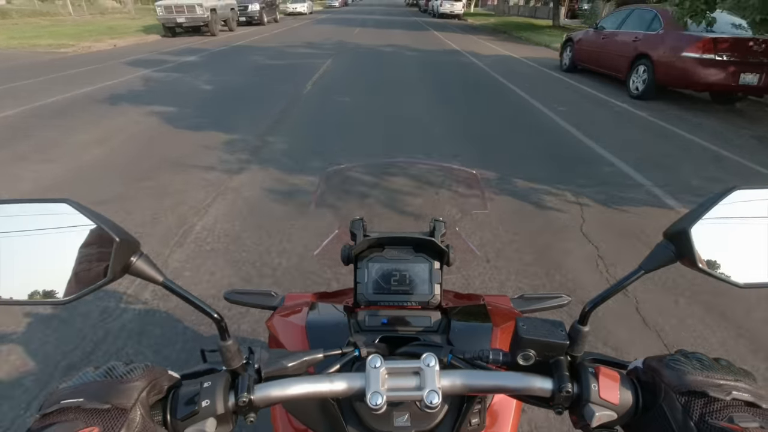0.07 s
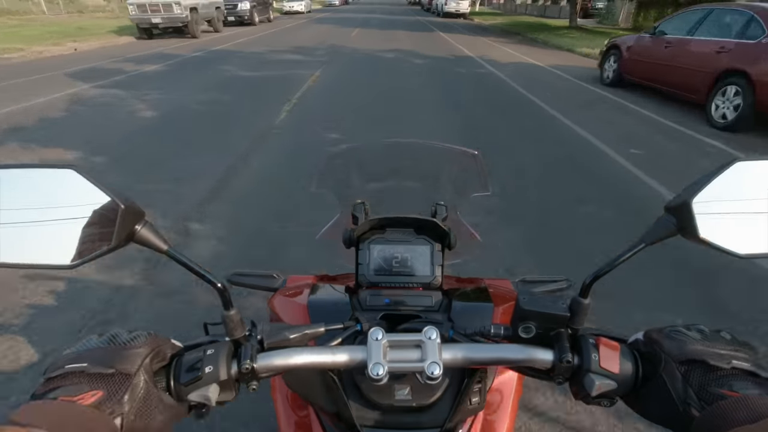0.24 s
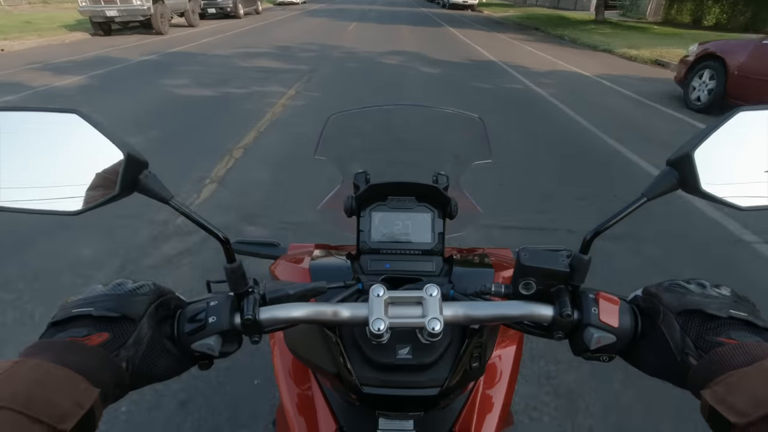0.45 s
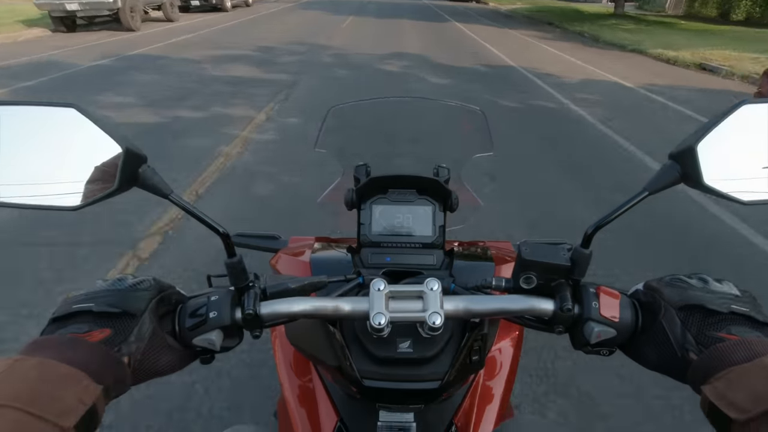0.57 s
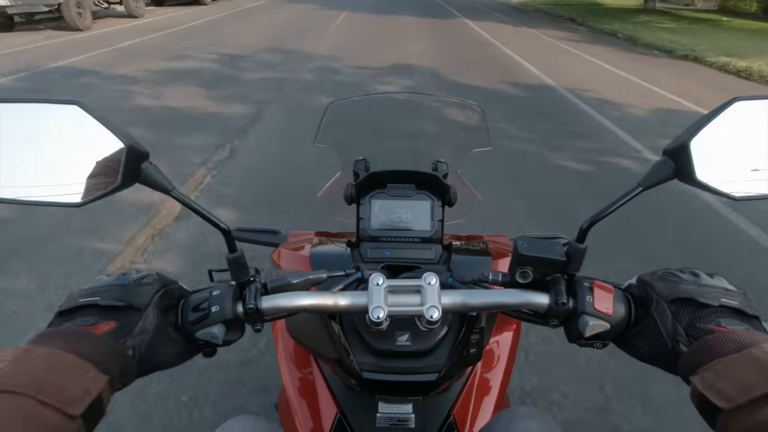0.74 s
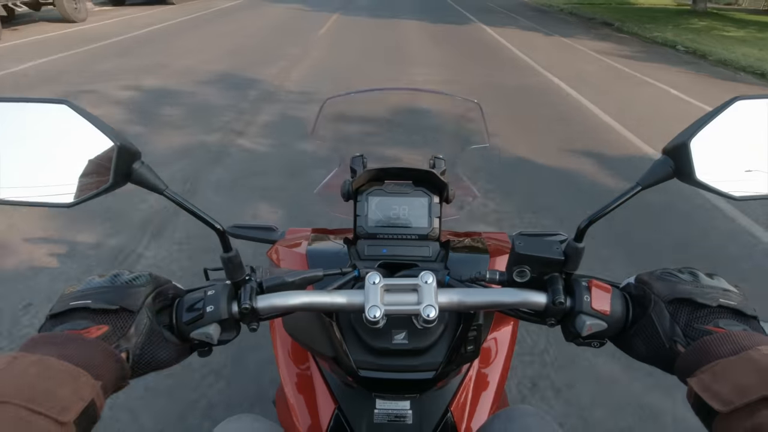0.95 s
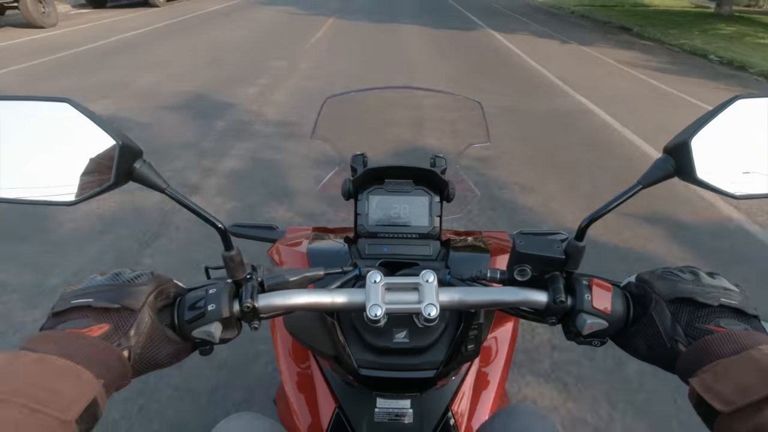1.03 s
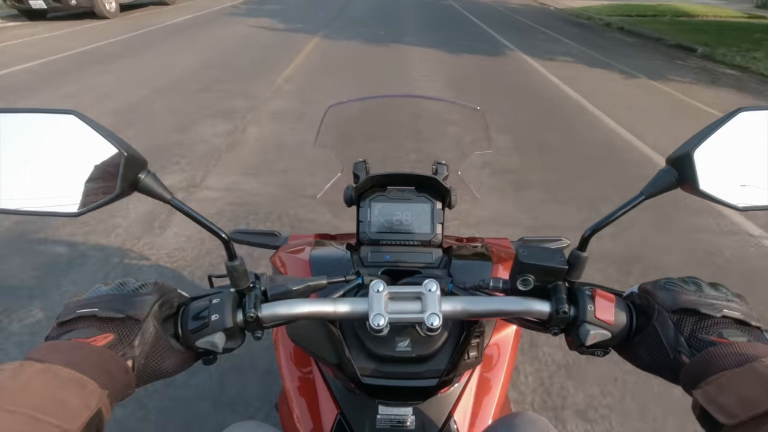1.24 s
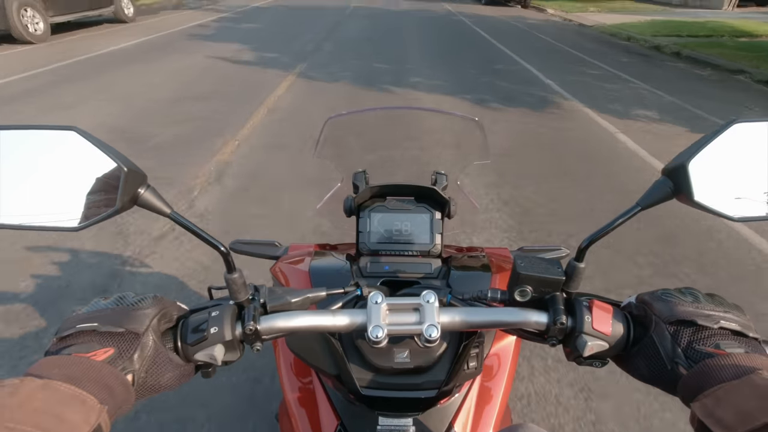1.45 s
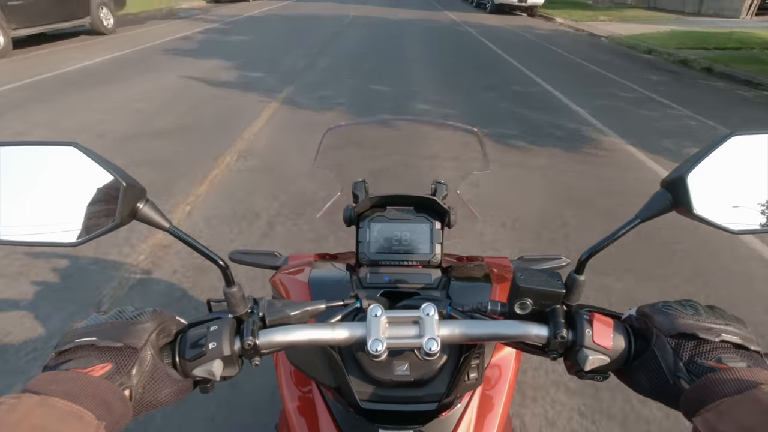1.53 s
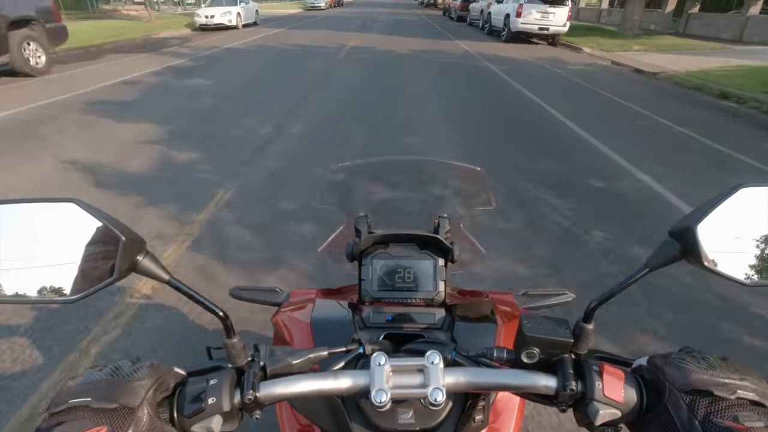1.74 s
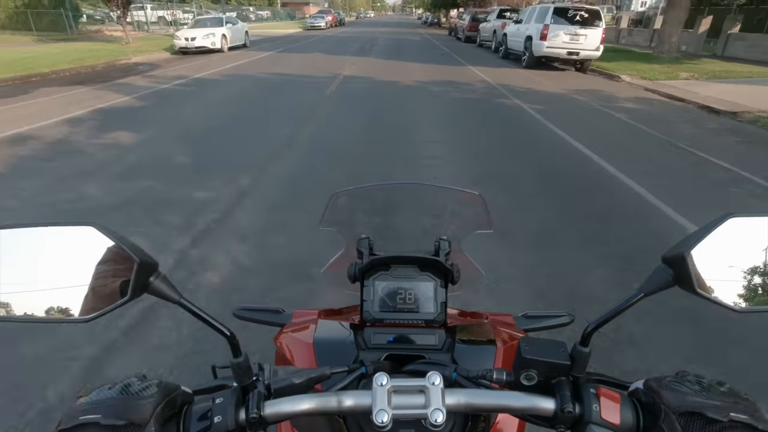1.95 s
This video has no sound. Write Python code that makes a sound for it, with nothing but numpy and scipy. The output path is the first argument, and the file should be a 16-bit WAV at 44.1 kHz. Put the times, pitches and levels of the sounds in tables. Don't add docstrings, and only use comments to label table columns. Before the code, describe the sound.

Wind buffeting on a rider's chest microphone fills all two seconds: deep, uneven rumble with soft thumps, strong at the start, around 0.77 and 1.13, and densest from 1.5 to the end. Far quieter, a small single-cylinder engine drones steadily under slightly rising load, with throbbing air and tyre hiss. The hiss briefly lifts near 0.74 passing parked cars; tiny grit ticks are nearly buried.

```python
import sys
import numpy as np
from scipy import signal
from scipy.io import wavfile
from scipy.ndimage import uniform_filter1d

SR = 44100
rng = np.random.default_rng(int(sys.argv[2]) if len(sys.argv) > 2 else 0)


def int16_out(signal):
    q = np.round(np.clip(np.atleast_2d(signal).T, -1, 1) * 32767)
    wavfile.write(sys.argv[1], SR, q.astype(np.int16))


def rack_gain(trim_db):
    fader = np.asarray(trim_db, float)
    return 10 ** (fader / 20)


N = 88200

# (time [s], gust level [dB], airstream level [dB], upward spread of buffet [dB])
AIRFLOW = [(0.03, -38.5, -55.5, -4), (0.072, -37.5, -59, -3), (0.1, -38.5, -57, 0),
           (0.37, -34.5, -58, -2.5), (0.408, -32.5, -57, 1.5), (0.574, -35.5, -57, -1.5),
           (0.77, -31, -56.5, 2.5), (0.812, -32, -55.5, 1.5), (1.082, -37, -55, 3), (1.12, -28, -57.5, 0.5),
           (1.186, -36, -56, 2), (1.59, -33.5, -52, 4.5), (1.624, -34, -52, 1.5), (1.672, -31.5, -57, 1),
           (1.698, -35.5, -50.5, 4.5), (1.742, -32, -54, 3), (1.774, -29.5, -52.5, 3),
           (1.97, -31.5, -53.5, 4.5)]
# (frequency [Hz], density [dB per Hz])
BUFFET_SPECTRUM = [(10, -6.5), (27, 3.5), (87, -3), (200, -11.5), (304, -16), (400, -20.5), (571, -29),
                   (900, -41)]
# (centre time [s], peak level [dB], swirl frequency [Hz], length [s])
SHED_EDDIES = [(-0.008, -21.5, 30.5, 0.033), (0.042, -30.5, 43, 0.013), (0.074, -27.5, 47.3, 0.017),
               (0.112, -29.5, 35, 0.035), (0.155, -30.5, 35, 0.038), (0.29, -31.5, 85, 0.018),
               (0.39, -39, 141, 0.043), (0.423, -32.5, 47.6, 0.2), (0.428, -29.5, 76.7, 0.037),
               (0.685, -29.5, 76.6, 0.037), (0.735, -33, 185.5, 0.025), (0.768, -26, 31.8, 0.05),
               (0.87, -35.5, 101, 0.052), (1.021, -33.5, 61, 0.043), (1.04, -35.5, 129.4, 0.067),
               (1.094, -29.5, 88.7, 0.013), (1.13, -23.5, 88.5, 0.011), (1.285, -33.5, 46, 0.021),
               (1.46, -29, 47.6, 0.045), (1.49, -28.5, 89, 0.032), (1.54, -30, 83.3, 0.035),
               (1.54, -33.5, 166, 0.033), (1.577, -48, 322, 0.082), (1.638, -29, 26.2, 0.1),
               (1.66, -36, 193, 0.022), (1.717, -33.5, 173, 0.027), (1.74, -26.5, 28.2, 0.077),
               (1.854, -30, 45.6, 0.031), (1.882, -31.5, 190, 0.035), (1.89, -37, 300, 0.032),
               (1.93, -25, 123, 0.043), (1.95, -37.5, 218, 0.06), (1.975, -27, 107, 0.035),
               (1.98, -27.5, 193.3, 0.026), (1.995, -25, 50, 0.02)]
# (frequency [Hz], density [dB per Hz])
ROAR_SPECTRUM = [(500, 3), (800, 3), (1200, 1.5), (1900, -4), (3000, -12.5), (5000, -26), (7500, -38.5),
                 (13000, -46.5)]
# (centre time [s], lift [dB], length [s])
REFLECTIONS = [
    (.48, 2.5, .04),
    (.585, 2, .03),
    (.738, 7, .032),
    (.9, 1.5, .08),
    (1.125, 2.5, .02),
]
# (time [s], level [dB])
THROTTLE = [
    (0, -3),
    (.5, -1),
    (1, -1),
    (1.5, .5),
    (2, 1),
]
ORDER_MULTIPLES = [2, 5, 7, 8, 11, 16, 17, 18, 19, 23, 24]
ORDER_LEVELS = [-51, -62, -60, -52, -58.5, -74, -74, -75, -71, -76, -70]
# (time [s], peak level [dB], ring frequency [Hz])
GRIT = [(.228, -81, 9200), (.5402, -73, 8000), (.5405, -76, 11500), (.6185, -71, 7000), (.754, -70, 5500),
        (1.9051, -73, 8300), (1.913, -71, 9500), (1.9135, -73, 11800), (1.947, -76, 9500)]

FIRING_HZ = 38.83
WAVER_DB, WAVER_HZ = 3.5, 7
FIRING_DEPTH, FIRING_DECAY = 0.6, 0.61
BODY_SHARE, FIZZ_SHARE = 0.34, 0.24
HISS_PATCHY_DB, FIZZ_PATCHY_DB, FIZZ_FLICKER_DB = 0.6, 2.2, 1.6
TICK_S = 0.0003


def evened(x):
    return x / np.sqrt(np.mean(x ** 2) + 1e-20)


def along(table, column):
    rows = np.array(table, float)
    return np.interp(np.arange(N) / SR, rows[:, 0], rows[:, column])


def turbulence(spectrum, low_hz, top_hz, size, patchy_db):
    hop = size // 4
    hz = np.fft.rfftfreq(size, 1 / SR)
    real, imaginary, patches = rng.standard_normal((N // hop + 5, len(hz), 3)).T
    patches = uniform_filter1d(patches, size=8, axis=0)
    patches = evened(uniform_filter1d(patches, size=6, axis=1))
    table_hz, table_db = np.transpose(spectrum)
    shape = rack_gain(np.interp(np.log(hz + 1), np.log(table_hz + 1), table_db))
    band_edges = (1 + (low_hz / (hz + 1)) ** 6) * (1 + (hz / top_hz) ** 6)
    shape = shape / np.sqrt(band_edges)
    bins = (real + 1j * imaginary) * shape[:, None] * rack_gain(patchy_db * patches)
    return evened(signal.istft(bins, nperseg=size, noverlap=size - hop)[1][:N])


def wind():
    gust_db = along(AIRFLOW, column=1)
    mean_db = gust_db.mean()
    rumble = rack_gain(gust_db - 1.5) * turbulence(BUFFET_SPECTRUM, 6, 220, size=4096, patchy_db=0.5)
    body_db = mean_db - 7.0 + BODY_SHARE * (gust_db - mean_db) + along(AIRFLOW, column=3)
    body = rack_gain(body_db) * turbulence(BUFFET_SPECTRUM, 136, 1000, size=2048, patchy_db=0.7)
    return rumble + body


def eddies():
    t, out = np.arange(N) / SR, np.zeros(N)
    for centre, db, hz, length in SHED_EDDIES:
        since = t - centre
        swell = rack_gain(db - 18.3 * (since / length) ** 2)
        out += swell * np.sin(2 * np.pi * hz * since)
    return out


def roar(turns):
    t = np.arange(N) / SR
    stream_db = along(AIRFLOW, column=2)
    mean_db = stream_db.mean()
    throb = evened(1 + FIRING_DEPTH * np.exp(-(turns % 1) / FIRING_DECAY))
    lift_db = np.zeros(N)
    for centre, db, length in REFLECTIONS:
        lift_db += db * np.exp(-((t - centre) / length) ** 4)

    mid_air = turbulence(ROAR_SPECTRUM, 710, 1900, size=1024, patchy_db=HISS_PATCHY_DB)
    mid = rack_gain(stream_db - 1.0 + 0.22 * lift_db) * throb * mid_air
    hiss_air = turbulence(ROAR_SPECTRUM, 1233, 9000, size=1024, patchy_db=HISS_PATCHY_DB)
    hiss = rack_gain(stream_db - 7.0 + lift_db) * hiss_air
    fizz_air = turbulence(ROAR_SPECTRUM, 7100, 16000, size=1024, patchy_db=FIZZ_PATCHY_DB)
    fizz = rack_gain(mean_db - 26.5 + FIZZ_SHARE * (stream_db - mean_db)) * fizz_air
    flicker = evened(uniform_filter1d(rng.standard_normal(N), size=1500))
    return mid + hiss + rack_gain(FIZZ_FLICKER_DB * flicker) * fizz


def engine(turns):
    out, t = np.zeros(N), np.arange(N) / SR
    for multiple, db in zip(ORDER_MULTIPLES, ORDER_LEVELS):
        rates, phases = rng.random((2, 6))
        swings = np.sin(2 * np.pi * (np.outer(t, (0.099 + rates) * WAVER_HZ) + phases))
        waver = evened(swings.sum(1))
        tone = np.cos(2 * np.pi * (multiple * turns + phases[0]))
        out += np.sqrt(2) * rack_gain(db + WAVER_DB * waver) * tone
    return out * rack_gain(along(THROTTLE, column=1))


def ticks():
    out, t = np.zeros(N), np.arange(300) / SR
    for start, db, hz in GRIT:
        envelope = t / TICK_S * np.exp(1 - t / TICK_S)
        jitter = 0.3 * rng.standard_normal(len(t))
        ring = envelope * np.sin(2 * np.pi * hz * t + jitter)
        out[round(start * SR):][:len(t)] += rack_gain(db + 1) * ring
    return out


def scene():
    t = np.arange(N) / SR
    firing_hz = FIRING_HZ * (1 + 0.002 * np.sin(2 * np.pi * 0.8 * t))
    turns = np.cumsum(firing_hz) / SR
    return (wind() + eddies() + roar(turns) + engine(turns) + ticks())[None]


def band_limit(x):
    return signal.sosfilt(signal.butter(12, 12750, fs=SR, output="sos"), x)


def record(dry):
    taps = signal.firwin(401, 12750, window=("kaiser", 9), fs=SR)
    high_pass = signal.butter(2, 5, "high", fs=SR, output="sos")
    steady = signal.sosfiltfilt(high_pass, dry)
    padded = np.pad(steady, ((0, 0), (200, 200)), mode="reflect")
    mix = signal.oaconvolve(padded, taps[None], "valid", axes=1)
    return band_limit(mix)


dry = scene()
out = record(dry)
int16_out(out)
```